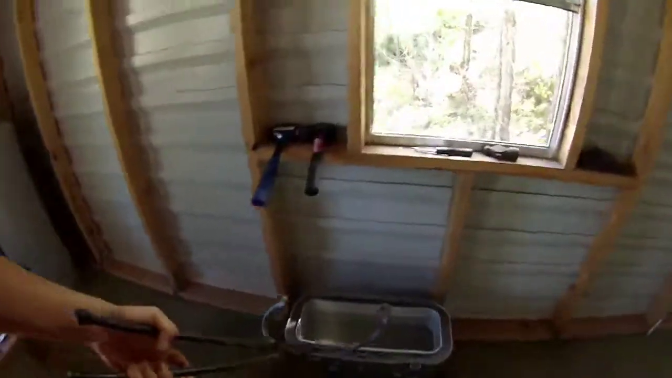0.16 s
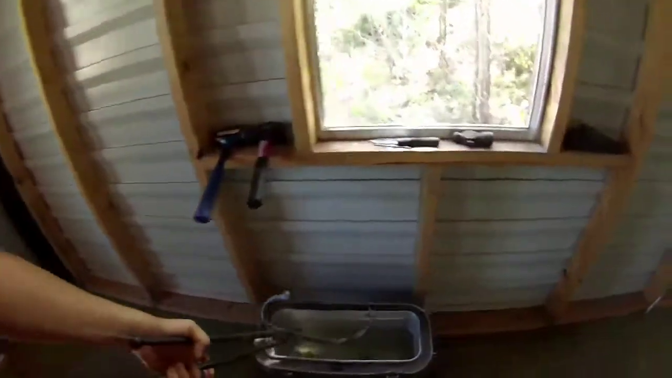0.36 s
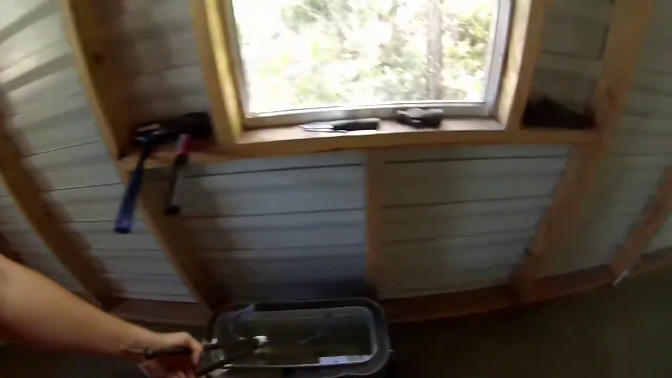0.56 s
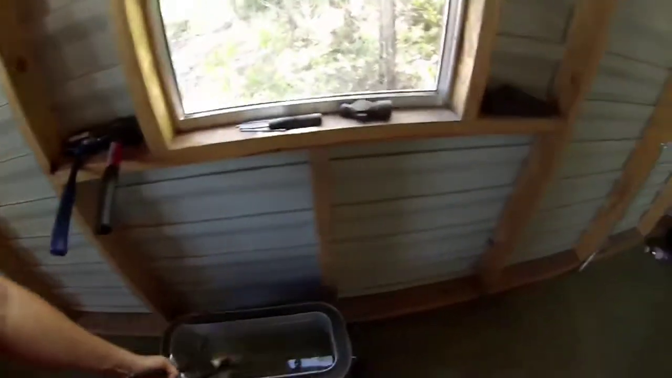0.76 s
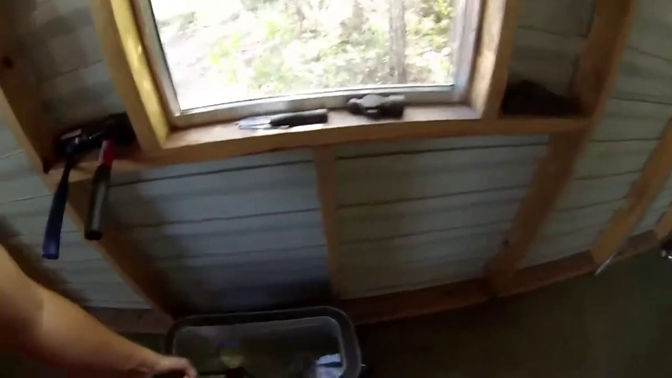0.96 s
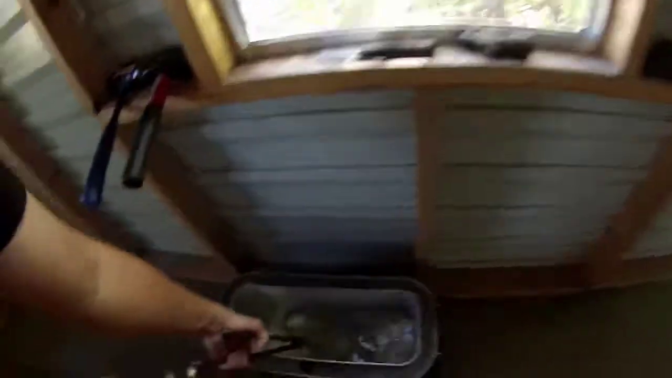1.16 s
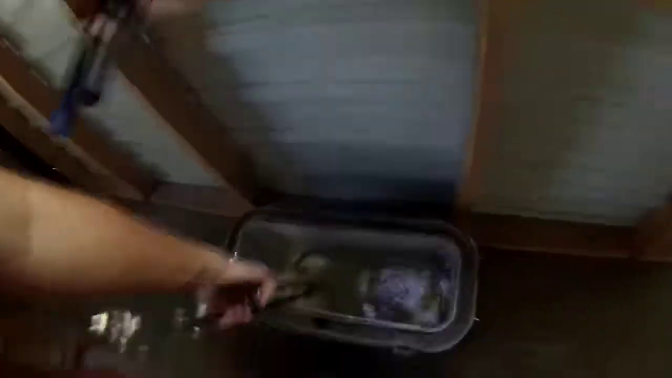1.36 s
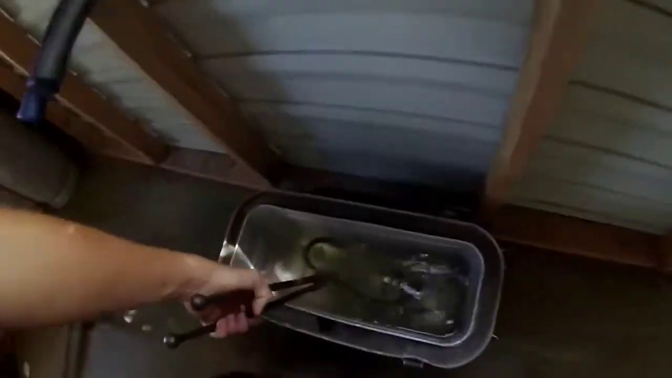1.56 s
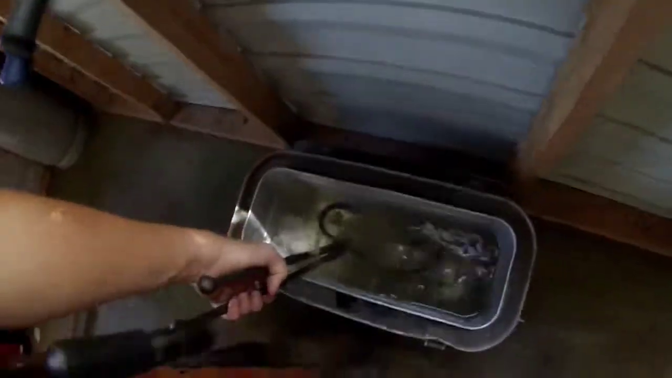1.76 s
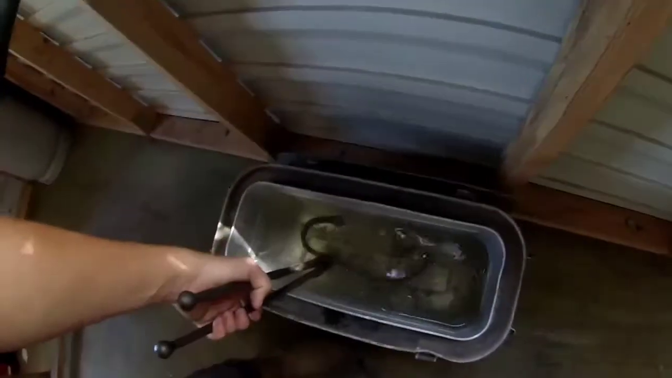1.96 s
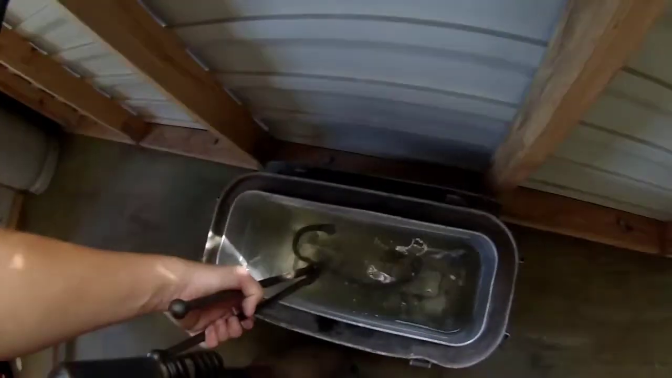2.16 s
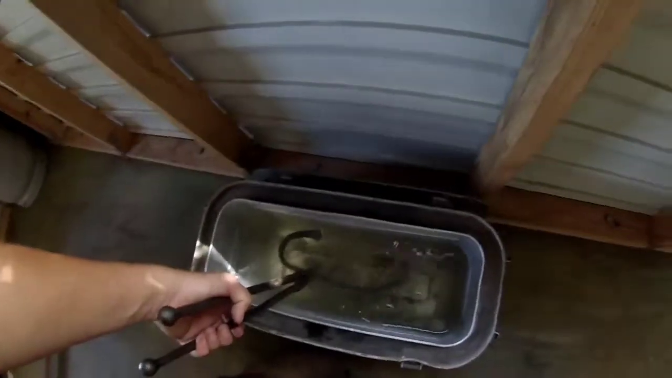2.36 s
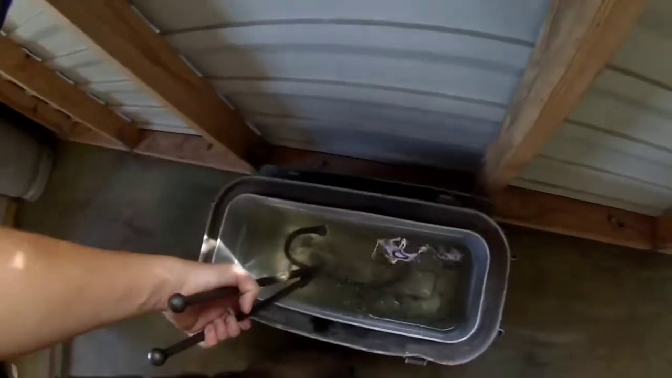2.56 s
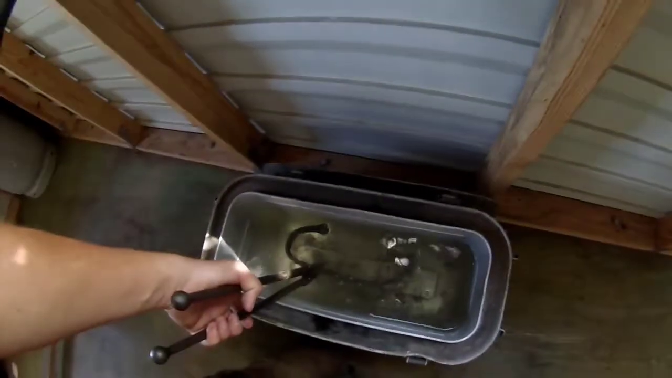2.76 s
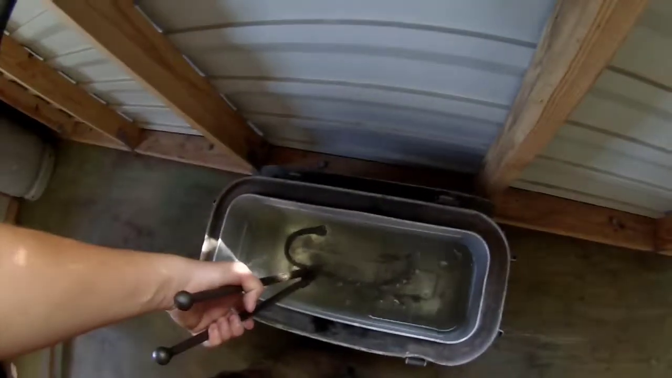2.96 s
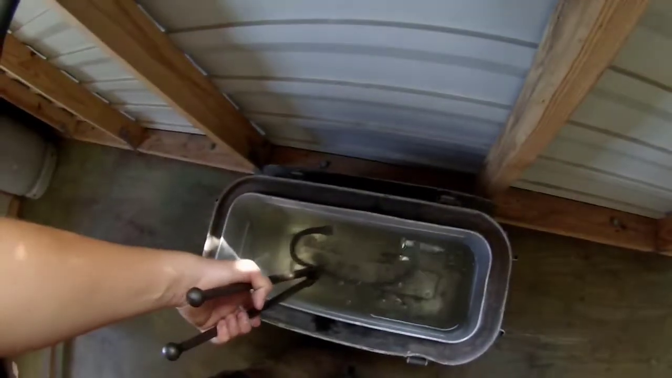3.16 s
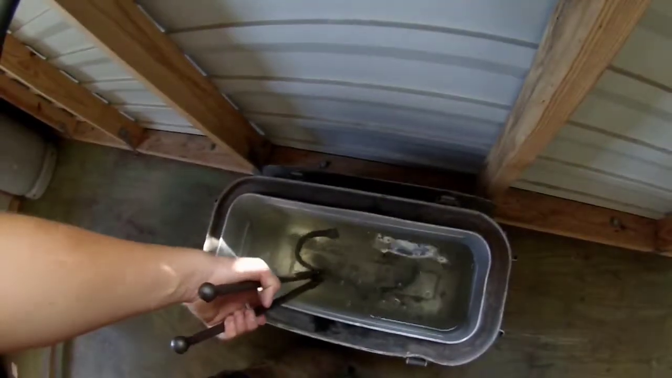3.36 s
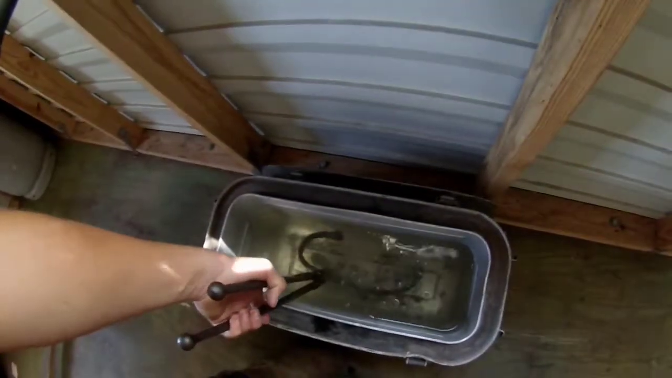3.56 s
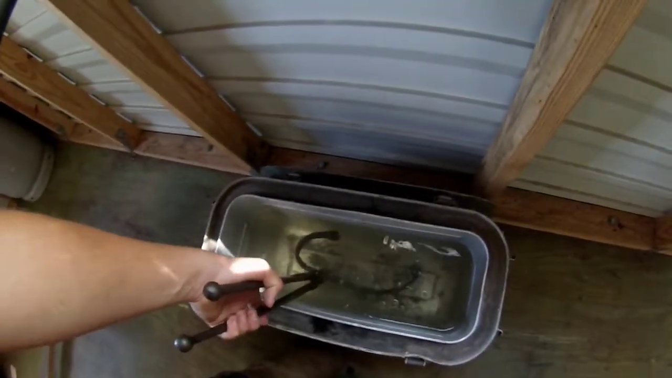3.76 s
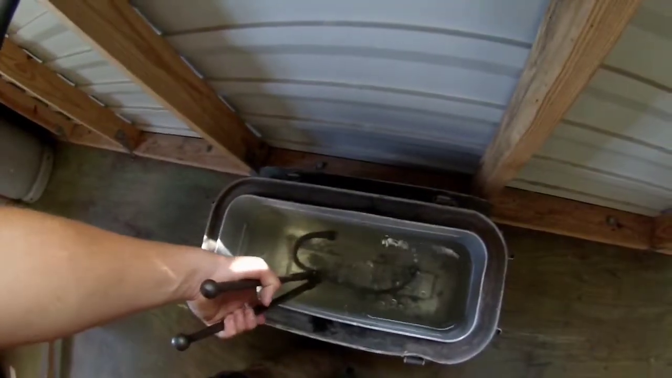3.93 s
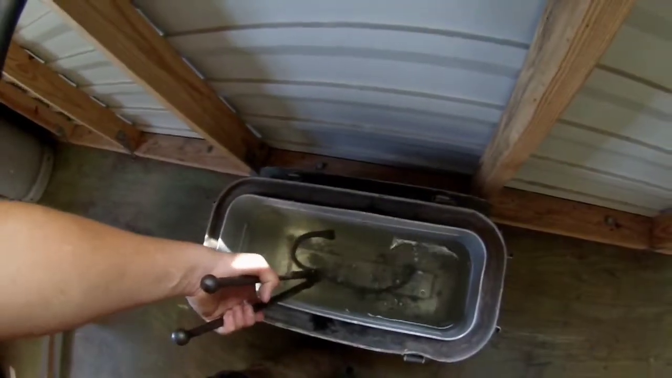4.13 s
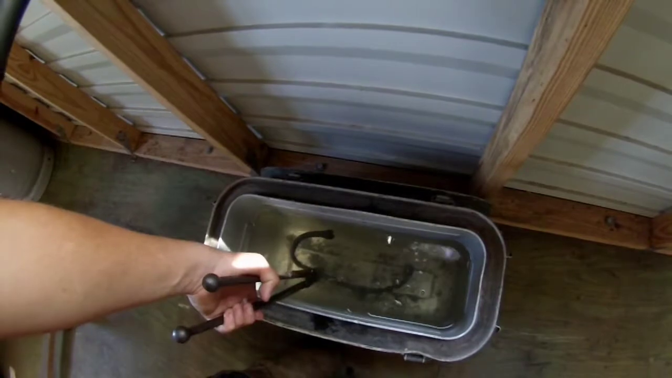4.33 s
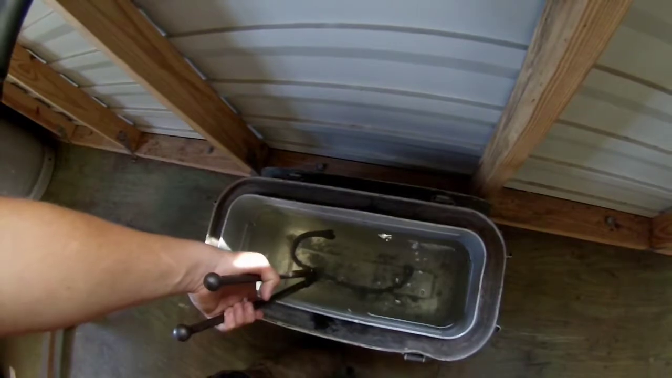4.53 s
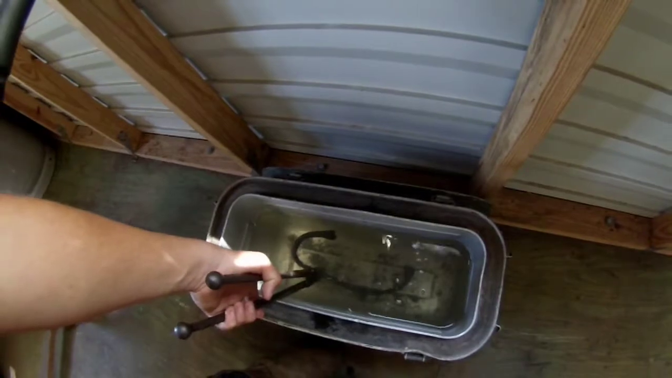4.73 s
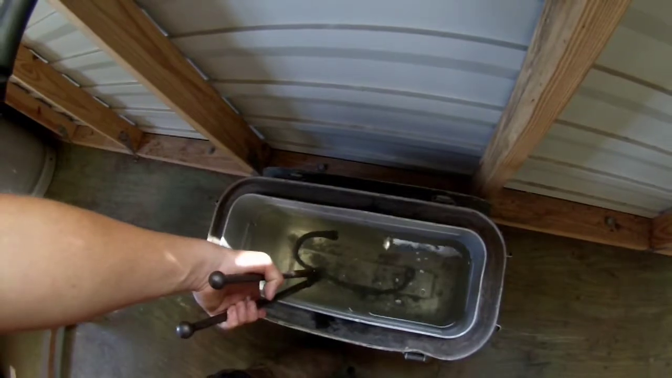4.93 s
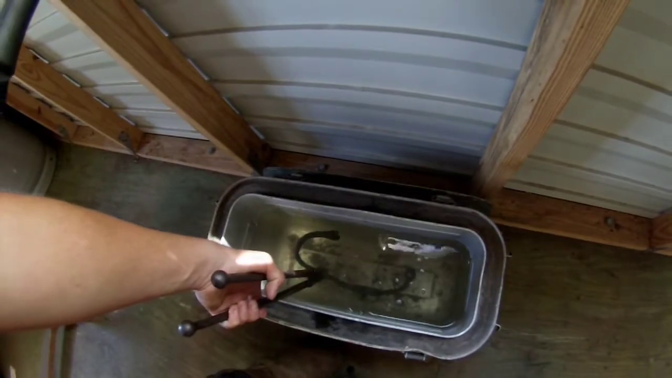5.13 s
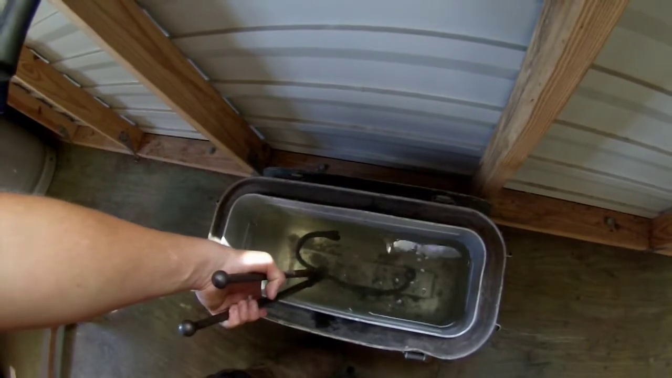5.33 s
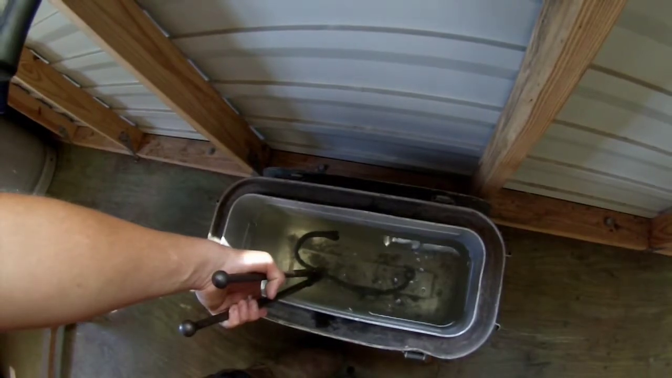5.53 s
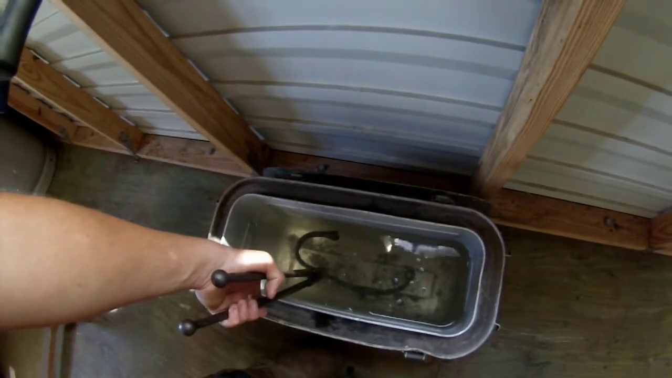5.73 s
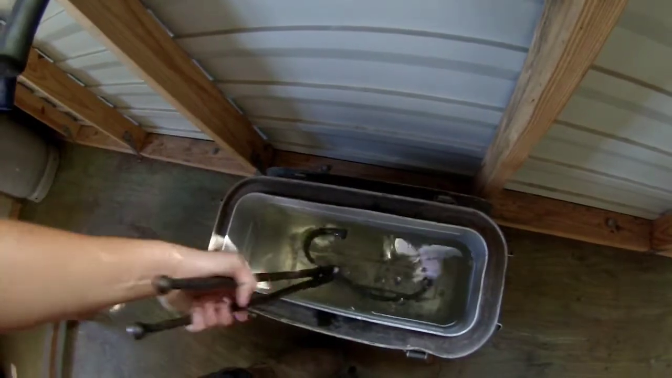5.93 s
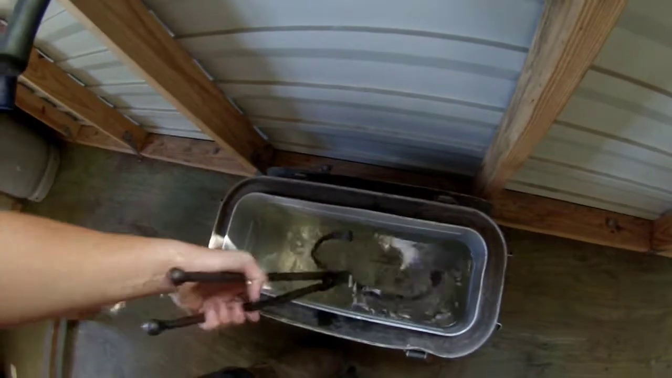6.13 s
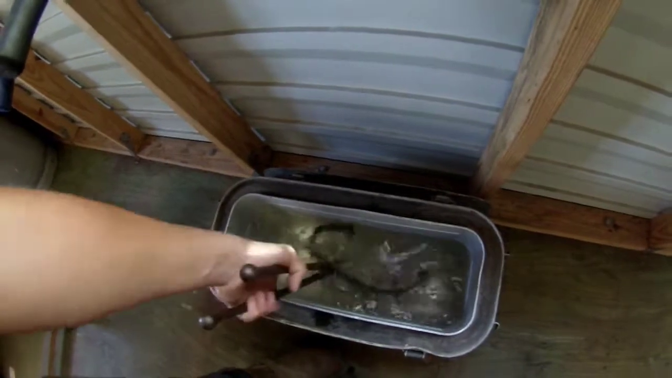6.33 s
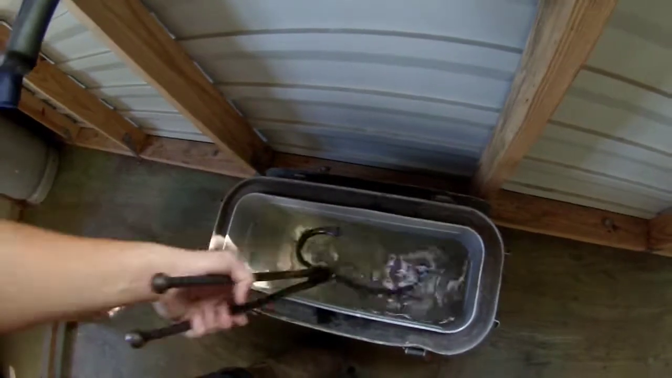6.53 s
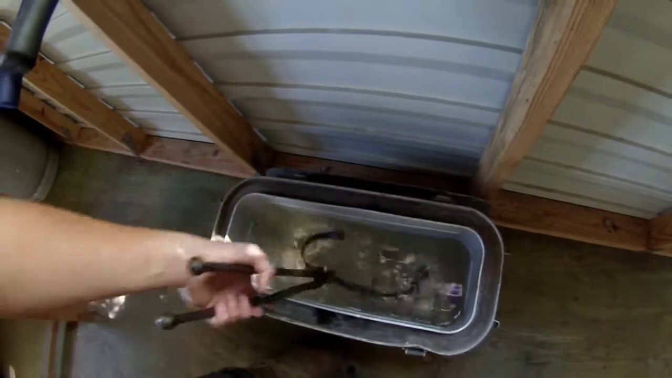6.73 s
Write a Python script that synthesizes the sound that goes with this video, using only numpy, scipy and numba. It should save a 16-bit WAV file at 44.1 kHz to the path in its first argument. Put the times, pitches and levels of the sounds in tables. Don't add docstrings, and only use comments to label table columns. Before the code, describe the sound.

In a small sheet-metal shed, close to a camera microphone with faint steady room noise, shoes thud and scuff on a gritty floor from 0 to 0.8 seconds, the heaviest steps near 0.05, 0.46 and 0.56. At 0.9 hot steel plunges into a metal tub of water: a hard clank and an intense, bright burst of steam. The hiss dips around 1.2, surges again, and a low dull knock lands at 1.44. Uneven sizzling swells near 2 and 2.5 over churning bubbles and singing tub walls. At 3.3 the hiss collapses abruptly; rounded glugs cluster until 4, and thin fizz fades to almost nothing by 5.5. Tongs rattle softly at 5.6 and water sloshes at 5.9. Sharp metallic knocks hit the tub at 6.15, 6.41, 6.66 and 6.86, with splashing drops, brief spray and a short shed echo.

```python
import sys
import numpy as np
from scipy import signal
from scipy.fft import rfft, irfft
from scipy.io import wavfile
from scipy.ndimage import uniform_filter1d
from numba import njit

SR = 44100
rng = np.random.default_rng(int(sys.argv[2]) if len(sys.argv) > 2 else 0)


def natural_amplitude(level_db):
    exponent = np.asarray(level_db, float) / 20
    return 10 ** exponent


def store_pcm(level_fs):
    pcm = np.round(np.clip(level_fs, -1, 1) * 32767).astype(np.int16)
    wavfile.write(sys.argv[1], SR, np.atleast_2d(pcm).T)


N = 303710

TOUCH_S, PLUNGE_S, JACKET_GONE_S, COLD_S = 0.885, 0.923, 3.335, 5.56


def unit(x):
    return x / np.sqrt(np.mean(x ** 2))


@njit
def svf(x, g, k):
    y, b, l = np.empty(len(x)), 0., 0.
    for i in range(len(x)):
        v = (b + g[i] * (x[i] - l)) / (1 + g[i] * (g[i] + k[i]))
        b, l, y[i] = 2 * v - b, l + 2 * g[i] * v, k[i] * v
    return y


def band(x, hz, width_hz):
    one = np.ones(len(x))
    return svf(x + 1e-18, np.tan(np.pi * hz / SR) * one, max(width_hz, 5) / hz * one)


def treble_above(x, hz):
    return signal.sosfilt(signal.butter(2, hz, "high", fs=SR, output="sos"), x)


def colour(x, table):
    hz, db = np.transpose(table)
    f = np.fft.rfftfreq(len(x), 1 / SR) + 1
    return irfft(rfft(x) * natural_amplitude(np.interp(np.log(f), np.log(hz), db)), len(x))


def walk(rate_hz, size=N):
    held = np.repeat(rng.standard_normal(int(max(N, size) / SR * rate_hz) + 2), 8)
    slow = unit(uniform_filter1d(uniform_filter1d(held, size=8), size=8))
    return np.interp(np.arange(size) * (8 * rate_hz / SR), np.arange(len(slow)), slow)


def play(table):
    s, *columns = np.transpose(table)
    return [np.interp(np.arange(N) / SR, s, c, left=c[0]) for c in columns]


def collapses(spread_db, flicker_db, rate_hz):
    uneven_db = spread_db * np.minimum(rng.exponential(1, N), 8)
    return rng.standard_normal(N) * natural_amplitude(uneven_db + flicker_db * walk(rate_hz))


def patchy(crowd, lo_hz, hi_hz, count, patchy_db, drift_db):
    n, sound = len(crowd), 0
    for hz in np.geomspace(lo_hz, hi_hz, count):
        pocket = crowd * rng.choice([-1., 1.], n)
        strength = natural_amplitude(patchy_db * walk(9.25, size=n))
        drifting_hz = hz * natural_amplitude(drift_db * walk(4, size=n))
        sound = sound + strength * band(pocket, drifting_hz, hz / 4.7)
    return np.pad(unit(sound), (0, N - n))


# [f/Hz, level/dB per Hz]
QUIET_SPECTRUM = [(22, -4.5), (60, 3), (170, -4), (600, -7), (1500, -16.5), (2300, -13.5), (4500, -19.5),
                  (8500, -15.5)]
QUIET_DB = -52.5


def quiet():
    return natural_amplitude(QUIET_DB + 0.23 * walk(3.8)) * unit(colour(rng.standard_normal(N), QUIET_SPECTRUM))


# [f/Hz, t60/s, level/dB]
SHED_DECAY = [(70, 0.98, -1.5), (120, 0.64, 4), (190, 0.48, 3), (350, 0.55, -0.5), (800, 0.63, 0),
              (2500, 0.64, -4), (6500, 0.6, -4), (12200, 0.37, -5.5)]
SHED_DB, PLINK_WET_DB = -6, -22


def shed(x):
    t, tail = np.arange(SR // 2) / SR, 0
    hz, t60_s, db = np.transpose(SHED_DECAY)
    for f in 60 * 2 ** np.arange(0, 8.1, .5):
        band_t60_s = np.interp(np.log(f), np.log(hz), t60_s)
        band_db = np.interp(np.log(f), np.log(hz), db)
        noise = band(rng.standard_normal(len(t)), f, f / 2)
        tail = tail + natural_amplitude(band_db) * noise * 1000 ** (-t / band_t60_s)
    tail = tail * (1 - np.exp(-t / 0.0076))
    return signal.oaconvolve(x, tail / np.sqrt(np.sum(tail ** 2)))[:N]


ECHO_DB, ECHO_T60_S, ECHO_LOW_HZ, ECHO_SHIFTS_HZ = -11, 0.042, 3500, 1.5


def echoes(x):
    t = np.arange(SR // 16) / SR
    taps = rng.standard_normal((2, len(t))) * 1000 ** (-t / ECHO_T60_S) * (t > .001)
    bright = treble_above(x, ECHO_LOW_HZ)
    a, b = (signal.oaconvolve(bright, h / np.sqrt(np.sum(h ** 2)))[:N] for h in taps)
    lean_rad = 2 * walk(ECHO_SHIFTS_HZ)
    return x + natural_amplitude(ECHO_DB) * (a * np.cos(lean_rad) + b * np.sin(lean_rad))


def impacts(table, width, rise_s, sub_db, crack_share, knock_db, snap):
    out, span = np.zeros(N + SR), SR // 4
    t = np.arange(span) / SR
    for s, db, hz, mid_db, top_db, length_s in table:
        low, mid, top = rng.standard_normal((3, span)) * (1 - np.exp(-t / rise_s))
        low[:24] += snap
        mid[:3] += snap
        low = low * 1000 ** (-t / max(length_s, .004))
        crack_fade = 1000 ** (-t / max(crack_share * length_s, .004))
        mid, top = mid * crack_fade, top * crack_fade
        knock_hz = hz + 480
        sag_hz = hz * (0.91 + 0.44 * np.exp(-t / 0.0028))
        parts = [band(band(low, sag_hz, width * hz), sag_hz, 3.0 * hz),
                 band(band(low, 93, 103), 75, 115),
                 band(band(low, knock_hz, knock_hz), knock_hz, 2 * knock_hz),
                 band(band(mid, 2470, 7100), 2470, 7100),
                 band(band(top, 10200, 9700), 7100, 16000)]
        gains = natural_amplitude(np.array([db, db + sub_db, db + knock_db, db + mid_db, db + top_db]))
        i = int(s * SR)
        out[i:i + span] += sum(g * p / np.abs(p).max() for g, p in zip(gains, parts))
    return out[:N]


def with_treble(table, rel_db):
    return [(s, db, hz, mid_db, mid_db + rel_db, length_s) for s, db, hz, mid_db, length_s in table]


# [t/s, peak level/dB, thud f/Hz, grit level/dB, length/s]
FOOTFALLS = [(0.0, -20.5, 204, -7.5, 0.23), (0.037, -12.5, 222, -21.5, 0.11),
             (0.079, -21.5, 250, -20, 0.28), (0.222, -27.5, 285, -25, 0.06), (0.277, -32, 137, -12, 0.12),
             (0.346, -34.5, 630, -3, 0.16), (0.415, -28.5, 490, -10.5, 0.14),
             (0.457, -15.5, 238, -2.5, 0.18), (0.559, -9.5, 205, -36, 0.06), (0.590, -20, 335, -30, 0.08),
             (0.635, -26, 700, -22, 0.054), (0.713, -29, 400, -8, 0.11), (0.831, -32.5, 172, -20, 0.16),
             (5.134, -49, 108, -7, 0.074)]
DUST_DB = -9.5


def steps():
    return impacts(with_treble(FOOTFALLS, DUST_DB), 1.0, 0.001, -9.5, 2.82, knock_db=-11.5, snap=0.79)


# [t/s, peak level/dB, body f/Hz, crack level/dB, length/s]
TONG_STIRS = [
    (5.571, -45, 2000, 4.5, 0.26),
    (5.895, -44, 600, -17, 0.3),
    (5.93, -42, 560, -12, 0.13),
    (6.016, -52, 900, 5, 0.038),
    (6.073, -42, 1410, -11, 0.028),
]
STIR_SPARKLE_DB = 3


def stirs():
    return impacts(with_treble(TONG_STIRS, STIR_SPARKLE_DB), 0.6, 0.0022, -29, 1.0, knock_db=-20, snap=0.3)


# [t/s, peak level/dB, body f/Hz, crack level/dB, sparkle level/dB]
TUB_BLOWS = [(0.926, -5, 470, 0.5, -8), (0.944, -5.5, 352, -13, -5), (1.439, -5.5, 186, -11, -4.5),
             (6.145, -8, 440, -5, -30), (6.163, -9.5, 286, -30, -30), (6.193, -19.5, 420, -7, -6),
             (6.225, -17.5, 696, -25, -4.5), (6.410, -11, 301, -16, -5.5), (6.414, -11.5, 465, 2, -2.5),
             (6.655, -6, 393, -5, -23), (6.671, -9, 860, 3.5, -1), (6.851, -17.5, 490, -10, -2),
             (6.873, -22.5, 720, -1, 0)]
BLOW_CYCLES = 31.5


def blows():
    table = [(*row, BLOW_CYCLES / (row[2] + 80)) for row in TUB_BLOWS]
    return impacts(table, 0.77, 0.00016, -14.0, 0.7, knock_db=-7.0, snap=0.7)


# [t/s, level/dB]
DROPLET_SHOWERS = [
    (6.15, -27),
    (6.415, -32),
    (6.66, -24),
]
SPLASH_S, DROP_LO_HZ, DROP_OCTAVES, DROP_CYCLES, DROP_DB_PER_S = 0.18, 450, 1.6, 12, -70


def droplets():
    rows = []
    for s, db in DROPLET_SHOWERS:
        when, size, pitch = rng.random((28, 3)).T
        delay_s = SPLASH_S * when
        hz = DROP_LO_HZ * 2 ** (DROP_OCTAVES * pitch)
        rows += zip(s + delay_s, db + DROP_DB_PER_S * delay_s - 8 * size, hz, DROP_CYCLES / hz)
    return rows


# [t/s, peak level/dB, f/Hz, t60/s]
BUBBLE_GLUGS = [(2.801, -39, 477, 0.038), (3.298, -20.5, 453, 0.035), (3.419, -26, 450, 0.036),
                (3.46, -25, 450, 0.1), (3.509, -27, 462, 0.081), (3.555, -31, 440, .06),
                (3.85, -43, 300, 0.027), (3.9, -38, 481, 0.03), (3.93, -35.5, 427, 0.067),
                (3.999, -38, 440.6, 0.029), (4.36, -41, 450, 0.075), (4.411, -44, 470, 0.045),
                (4.72, -43.5, 484, .06), (5.061, -46, 467, 0.072)]
# [t/s, peak level/dB, f/Hz, t60/s]
CONTACT_RINGS = [(.462, -10.5, 264, 0.086), (.561, -8, 218, 0.079), (0.591, -28, 180, .08),
                 (1.443, -13, 190, 0.12), (.353, -42, 2600, 0.2), (.56, -15.5, 642, 0.073),
                 (.61, -27, 556, 0.055), (.834, -37, 1010, .04), (5.572, -47, 7750, .15),
                 (5.58, -53, 12900, .12), (5.932, -39.5, 572, 0.13), (6.018, -32, 2250, 0.036),
                 (6.074, -30, 1400, 0.049), (6.076, -46, 1416, 0.54), (6.195, -27, 1970, .03),
                 (6.197, -26, 1250, 0.05), (6.18, -26, 1020, .035), (6.222, -14, 970, .025),
                 (6.745, -21, 1010, 0.037), (6.218, -15, 2390, 0.025), (6.225, -25, 7830, 0.033),
                 (6.672, -14, 8070, 0.031), (6.675, -34, 8000, .2), (6.675, -21, 2530, 0.025),
                 (6.418, -23.5, 2830, .05), (6.671, -10, 5160, 0.017),
                 (6.42, -18, 280, .15), (6.69, -24, 180, .25), (6.2, -28, 62, .4), (.94, -14, 110, 0.08),
            (.945, -12, 600, .05), (.958, -11.5, 380, 0.075), (.955, -14.5, 270, .09),
            (1.44, -10, 130, 0.065), (1.442, -11, 543, 0.048), (1.458, -16, 310, 0.16),
            (1.47, -16.5, 236, .12), (1.49, -16, 195, .1), (1.56, -24, 520, .05), (6.672, -21, 3750, .03),
            (6.879, -27, 3300, 0.019), (0.928, -2.5, 450, 0.043), (.93, -11, 800, 0.053),
            (6.147, -9.5, 450, 0.053), (6.165, -12.5, 381, 0.099), (6.226, -12, 664, 0.094),
            (6.234, -16.5, 659, 0.11), (6.247, -10.5, 660, 0.12), (6.29, -24, 677, .06),
            (6.412, -7, 623, 0.064), (6.414, -17, 830, 0.04), (6.414, -19, 1660, 0.039),
            (6.417, -3.5, 439, 0.047), (6.656, -9, 800, 0.035), (6.662, -13.5, 460, 0.063),
            (6.674, -14, 872, 0.048), (6.66, -23, 187, 0.1), (6.147, -22, 130, 0.18), (6.15, -21, 261, .12),
            (6.46, -32, 71, 0.84), (6.415, -22, 190, 0.16), (6.854, -26, 350, 0.16),
            (6.852, -14.5, 520, 0.06), (6.862, -15, 528, 0.1), (6.879, -10.5, 673, 0.079)]
WAVER_HZ, WAVER_AFTER_S, WAVER_DB, WAVER_PITCH = 45, .05, 3.5, .025


def plinks():
    age, out = np.arange(SR // 4) / SR, np.zeros(N + SR)
    swell, bend = walk(WAVER_HZ, size=N + SR), walk(WAVER_HZ, size=N + SR)
    late = np.clip(age / WAVER_AFTER_S, 0, 1)
    for s, db, hz, t60_s in BUBBLE_GLUGS + CONTACT_RINGS + droplets():
        here = slice(int(s * SR), int(s * SR) + len(age))
        level = (1 - np.exp(-age * hz / 0.83)) * 1000 ** (-age / t60_s)
        level = level * natural_amplitude(WAVER_DB * late * swell[here])
        cycles = hz * np.cumsum(1 + WAVER_PITCH * late * bend[here]) / SR
        out[here] += natural_amplitude(db) * level * np.sin(2 * np.pi * cycles)
    return out[:N]


# [t/s, peak level/dB, f/Hz]
BRIGHT_SPITS = [(5.682, -50, 10500), (5.76, -49, 10500), (5.775, -49, 10000), (5.838, -50, 14000),
                (5.89, -50, 14000), (5.967, -49, 13000), (5.997, -50, 12500), (6.038, -45, 12000),
                (.355, -40, 3900), (.46, -21, 3700), (.462, -33, 8000), (4.925, -39, 10000),
                (4.93, -44, 5600), (5.40, -43, 10000), (5.745, -47, 10500), (5.787, -41, 9200),
                (5.812, -43, 9100), (5.855, -48, 9000), (6.09, -44, 10500), (6.10, -44, 9600),
                (6.25, -35, 5600), (6.272, -38, 5500), (6.271, -36, 9500), (6.33, -40, 10500),
                (6.345, -41, 7500), (6.386, -40, 9500), (6.592, -31.5, 7000), (6.595, -42, 10500),
                (6.778, -38, 12400), (6.836, -29, 10000), (6.841, -33, 10000), (6.846, -29, 5000),
                (6.875, -15.5, 5700), (6.882, -15, 7000), (.278, -36, 1600), (.022, -40, 9200),
                (.097, -41, 12000), (.74, -38, 7800), (.83, -38, 7500), (6.854, -28, 12600),
                (6.414, -6, 9600), (6.415, -16, 14000)]
SPIT_S, SPIT_TAIL_S, SPIT_TAIL_DB = 0.00094, .008, -15


def ticks():
    when, size, pitch = rng.random((70, 3)).T
    faint = np.transpose([4.8 + 1.9 * when ** .7, -52 - 10 * size, 7500 * 1.8 ** pitch])
    out, age = np.zeros(N + SR), np.arange(2048) / SR
    fade = np.exp(-age / SPIT_S) + natural_amplitude(SPIT_TAIL_DB) * np.exp(-age / SPIT_TAIL_S)
    for s, db, hz in [*BRIGHT_SPITS, *faint]:
        burst = rng.standard_normal(len(age)) * fade
        spit = band(band(burst, hz, hz / 4.5), hz, hz / 2)
        out[int(s * SR):int(s * SR) + len(age)] += natural_amplitude(db) * spit / np.abs(spit).max()
    return out[:N]


# [start t/s, end t/s, f/Hz, start level/dB, fade/dB]
SINGING_MODES = [(1.7, 3.18, 691, -38.5, 7.5), (2.398, 2.5, 7200, -39, -2), (2.75, 3.15, 3950, -40, 5),
                 (3.0, 4.62, 2410, -46, -8.5), (3.9, 5.17, 2400, -53.5, -8), (4.7, 5.94, 2400, -60.5, -5),
                 (2.9, 6.2, 2040, -49.5, -21), (3.3, 6.1, 3160, -60, -20), (2.3, 4.6, 1500, -43, -18),
                 (3.3, 4, 4110, -48, -4), (4.2, 5.3, 5550, -58, -10), (4.3, 5.3, 6030, -62, -6),
                 (3.8, 4.5, 6450, -54, -2), (4, 4.44, 5900, -55, -7), (3.5, 4.4, 8930, -56.5, -4),
                 (3.4, 4.26, 3560, -59, -8), (1.2, 1.35, 6900, -36, -2), (1.15, 1.7, 7320, -38, -9),
                 (1.42, 2.9, 4450, -44, -4), (1.93, 2.16, 7950, -33, -2), (1.93, 2.8, 5000, -43, -5),
                 (2.25, 3.02, 6630, -40.5, 4), (1.85, 2.9, 3390, -42, 0), (2.7, 3.4, 3400, -42.5, 2),
                 (1.9, 2.9, 2220, -51, -1), (1.2, 1.9, 10800, -46, -6), (2.4, 2.9, 5150, -42, 1),
                 (2.05, 2.8, 1330, -39.5, 0)]
SING_WIDTH_HZ, SING_Q = 42, 50
# [start t/s, end t/s, start f/Hz, end f/Hz, start
# level/dB]
FIZZ_BANDS = [(1.22, 1.6, 1370, 1500, -34.5), (1.35, 1.46, 2200, 2000, -38),
              (0.89, 1.56, 8100, 7100, -36), (1.97, 3.35, 1030, 1420, -37), (2.6, 3.46, 720, 1030, -35.5),
              (2.8, 4.3, 7300, 8560, -44), (3.053, 5.1, 9700, 10100, -48.5), (3.36, 4.7, 410, 450, -52),
              (3.301, 3.83, 1040, 1130, -42.5), (3.6, 5.3, 1120, 1050, -54),
              (3.6, 6.3, 6300, 5700, -51.5), (3.7, 5.5, 5840, 5300, -48.5),
              (3.28, 3.65, 4800, 3900, -45.5), (3.3, 3.6, 5600, 5300, -51), (3.3, 4.2, 2930, 3000, -51),
              (0.95, 1.19, 2900, 3100, -33.5), (4.4, 5.6, 8100, 7500, -57), (1.1, 1.52, 560, 400, -34),
              (3.4, 4.16, 4400, 4600, -49.5), (2.4, 3.86, 3400, 3200, -55),
              (5.555, 5.74, 1650, 1740, -52), (5.555, 5.74, 2400, 2300, -53),
              (5.555, 5.72, 3300, 3300, -55), (1.02, 1.12, 3000, 3400, -29), (1.06, 1.2, 2390, 2350, -38),
              (3.3, 3.9, 4040, 4100, -47), (3.45, 4.2, 8300, 8300, -51), (.34, 0.42, 7000, 7000, -54),
              (4.0, 5.3, 4300, 4300, -57), (2.65, 3.35, 810, 850, -39), (0, .17, 11500, 11500, -50)]
POCKET_WIDTH_HZ, POCKET_Q, POCKET_DB_PER_S = 120, 8.8, -9.5
# [t/s, f/Hz, level/dB]
SHORT_SPRAYS = [(6.415, 4600, -36.5), (6.414, 9600, -42), (6.414, 8200, -50), (6.672, 5000, -40),
                (5.56, 9400, -55), (5.56, 11100, -55), (5.56, 12900, -54), (5.56, 14300, -55),
                (5.565, 6100, -57), (0.43, 1860, -38), (6.672, 9100, -43), (6.672, 7500, -42)]
SPRAY_S, SPRAY_Q, SPRAY_FADE_DB = 0.22, 7.9, -19.5
# (start t/s, end t/s, start f/Hz, end f/Hz, width/Hz, level/dB, fade/dB)
LAST_FIZZ = (3, 5.5, 7200, 10007, 7202, -41.5, -19)


def pockets():
    rows = [(a, b, hz, hz, SING_WIDTH_HZ + hz / SING_Q, db, fade_db) for a, b, hz, db, fade_db in SINGING_MODES]
    for a, b, hz0, hz1, db in FIZZ_BANDS:
        cooled_db = POCKET_DB_PER_S * max(b - max(a, JACKET_GONE_S), 0)
        rows.append((a, b, hz0, hz1, POCKET_WIDTH_HZ + hz0 / POCKET_Q, db, cooled_db))
    rows += [(s, s + SPRAY_S, hz, hz, hz / SPRAY_Q, db, SPRAY_FADE_DB) for s, hz, db in SHORT_SPRAYS]
    return rows + [LAST_FIZZ]


POCKET_DRIFT = .004


def simmer():
    out, crowd = np.zeros(N), collapses(1.5, 1.04, 30.12)
    for start, end, hz0, hz1, width_hz, db, fade_db in pockets():
        i, j = int(start * SR), min(int(end * SR), N)
        age = np.linspace(0, 1, j - i)
        hz = (hz0 + (hz1 - hz0) * age) * (1 + POCKET_DRIFT * walk(5.2, size=j - i))
        edges = np.clip(age / 0.11, 0, 1) * np.clip((1 - age) / 0.47, 0, 1)
        clicks = crowd[i:j] * rng.choice([-1., 1.], j - i)
        fizz = band(band(clicks, hz, width_hz), hz, 2.4 * width_hz)
        out[i:j] += natural_amplitude(db + fade_db * age + 1.3 * walk(14, size=j - i)) * edges * unit(fizz)
    return out


# [t/s, level/dB]
BOIL_VIGOUR = [
    (0.93, -23.5),
    (1.05, -27.5),
    (1.17, -32.5),
    (1.38, -27),
    (1.58, -33),
    (1.84, -32.5),
    (2.1, -29),
    (2.55, -28.5),
    (3.0, -34.5),
]
# [f/Hz, width/Hz, level/dB]
TUB_WALLS = [(1480, 130, -3.5), (2070, 79, -3), (2347, 200, -2), (3410, 106, -3.5)]
# [f/Hz, width/Hz, level/dB]
TUB_BELLY = [(243, 61, 0), (451, 48, 6.5), (696, 27, 1.5), (1010, 60, -3.5)]
# [t/s, level/dB, fade/dB per s]
WATER_HEAVES = [
    (0.93, -27, -74),
    (1.08, -41, -12.5),
    (1.43, -34, -72),
    (1.6, -39, -16.5),
    (3.33, -45, -20),
    (4.3, -64, -18),
]
CALM_DB, CALM_S, COOL_DB_PER_S = -4.5, 0.086, -14.5
CHURN_HOT_DB, CHURN_DB, CHURN_RISE_S = -3, 0.97, 1
CHURN_STOPS_S, CHURN_COLD_DB = 3.57, -3
BUBBLE_HZ, BUBBLE_HZ_PER_S, BUBBLE_COLD_HZ_PER_S = 510, 137, -80
BELLY_DB, BELLY_DB_PER_S, BELLY_SETTLES_S = -2.5, -3, 1.54


def boil():
    drive, t = collapses(2.5, 0.24, 30.0), np.arange(N) / SR
    late_s = np.clip(t - JACKET_GONE_S, 0, None)
    calm_db = CALM_DB * np.clip(late_s / CALM_S + .5, 0, 1) * (late_s > 0)
    sing_db = play(BOIL_VIGOUR)[0] + calm_db + COOL_DB_PER_S * late_s
    churn_db = sing_db + CHURN_DB + CHURN_HOT_DB * np.clip(1 - (t - PLUNGE_S) / CHURN_RISE_S, 0, 1)
    churn_db = churn_db + CHURN_COLD_DB * np.clip((t - CHURN_STOPS_S) / 0.048, 0, 1)

    walls = sum(natural_amplitude(db + 1.8 * walk(14)) * unit(band(drive, f, w)) * np.sqrt(w) for f, w, db in TUB_WALLS)
    sing = natural_amplitude(np.clip(t - 3.6, -9, -1.5)) * unit(walls)
    sing = sing + patchy(drive, 1940, 4090, count=6, patchy_db=-2.4, drift_db=1.3)

    drive = collapses(2.06, 0.18, 25.3)
    belly = sum(natural_amplitude(db + 2.2 * walk(10.24)) * unit(band(drive, f, w)) for f, w, db in TUB_BELLY)
    belly_db = BELLY_DB + BELLY_DB_PER_S * np.clip(t - PLUNGE_S, 0, BELLY_SETTLES_S)
    hot_s = np.clip(t - PLUNGE_S, 0, JACKET_GONE_S - PLUNGE_S)
    hz = BUBBLE_HZ + BUBBLE_HZ_PER_S * hot_s + BUBBLE_COLD_HZ_PER_S * late_s
    churn = unit(band(drive, np.clip(hz, 100, None), 430)) + natural_amplitude(belly_db) * unit(belly)

    rumble = unit(band(band(drive, 290, 400), 130, 600)) + natural_amplitude(-5) * unit(band(drive, 76, 70))
    heave = sum(natural_amplitude(db + fade_db * np.clip(t - s, 0, None)) * np.clip((t - s) / 0.03 + 1, 0, 1)
                for s, db, fade_db in WATER_HEAVES)
    under = natural_amplitude(churn_db + 0.6 * walk(9)) * unit(churn) + heave * natural_amplitude(2.0 * walk(7.93)) * unit(rumble)
    under = under * np.clip((t - PLUNGE_S) / 0.015, 0, 1)
    start = np.clip((t - TOUCH_S) / (BOIL_VIGOUR[0][0] - TOUCH_S), 0, 1) ** 1.6
    return (natural_amplitude(sing_db - 2.5) * sing * start + under) * np.clip((COLD_S - t) / .15, 0, 1)


# [peak t/s, hiss level/dB, rise/s, fade/dB per s, air level/dB re hiss]
STEAM_GUSHES = [(0.91, -19, 0.04, -90, -7), (1.0, -15.5, 0.058, -85, -2.5), (1.045, -22.5, 0.03, -75, -6),
                (1.21, -26.5, 0.074, -62, 4), (1.29, -22.5, 0.17, -20, -4.5), (1.73, -27.5, 0.15, -29, -5),
                (1.97, -25, 0.12, -2.5, -2.5), (2.51, -28.5, 0.17, -10.5, -6), (3.159, -29, 0.18, -57, 3.5),
                (1.4, -37, .1, -120, 8), (3.272, -35, .02, -250, 4), (3.322, -35, .015, -150, 0)]
STEADY_GUSH_END_S, GUSH_END_DB_PER_S = 2.38, -15.5
ROAR_DB, ROAR_DB_PER_S, ROAR_FAILS_S = -7.5, 2.5, .06
REMNANT_DB, REMNANT_DB_PER_S = -15, -24


def steam():
    t = np.arange(N) / SR
    failing_db = GUSH_END_DB_PER_S * np.clip(t - STEADY_GUSH_END_S, 0, None)
    hiss_power = air_power = 0
    for s, db, rise_s, fade_db, air_db in STEAM_GUSHES:
        gush_db = db + fade_db * np.clip(t - s, 0, None) + failing_db * (s < STEADY_GUSH_END_S)
        gush = np.clip(1 + (t - s) / rise_s, 0, 1) ** 1.18 * natural_amplitude(gush_db)
        hiss_power = hiss_power + gush ** 2
        air_power = air_power + (gush * natural_amplitude(air_db)) ** 2
    drive = collapses(1.84, 0.84, 60.03)[:N // 2]
    air = treble_above(collapses(2.2, 2.0, 19), 10500)
    hiss = patchy(drive, 6530, 10570, count=5, patchy_db=-2.2, drift_db=0.5)
    roar_db = ROAR_DB + ROAR_DB_PER_S * np.clip(t - TOUCH_S, 0, 3)
    roar_db = roar_db - 6.6 * np.clip(1 + (t - JACKET_GONE_S) / ROAR_FAILS_S, 0, 1)
    hiss = hiss + natural_amplitude(roar_db) * patchy(drive, 4020, 6500, count=4, patchy_db=1.4, drift_db=1.0)
    remnant = natural_amplitude(REMNANT_DB + REMNANT_DB_PER_S * np.abs(t - JACKET_GONE_S))
    jacket = np.maximum((JACKET_GONE_S - t) / 0.0086 + 1, remnant).clip(0, 1)
    return (np.sqrt(hiss_power) * hiss + np.sqrt(air_power) * unit(air)) * jacket


def scene():
    contacts, knocks, rings = steps() + stirs(), blows(), plinks()
    wet = shed(natural_amplitude(SHED_DB) * (contacts + natural_amplitude(-5.0) * knocks) + natural_amplitude(PLINK_WET_DB) * rings)
    wet = wet * natural_amplitude(1.2 * walk(40))
    water = natural_amplitude(-0.31) * echoes(steam() + boil() + simmer()) + ticks()
    return np.tile(water + contacts + knocks + rings + wet + quiet(), (2, 1))


FLECKS, FLECK_DB = 26, -1.5


def flecks(mono):
    side, span = np.zeros(N), 2048
    for k, (when, shift) in enumerate(rng.random((FLECKS, 2))):
        i = int((1.1 + 2.3 * when) * SR)
        hz = 4800 * 2.84 ** ((k + shift) / FLECKS)
        part = lambda x: band(band(band(x, hz, hz / 4), hz, hz / 4), hz, hz / 4)
        fleck = unit(part(rng.standard_normal(span))) * np.hanning(span)
        side[i:i + span] += fleck * part(mono[i:i + span]).std()
    return natural_amplitude(FLECK_DB) * side + natural_amplitude(-80.0) * unit(band(rng.standard_normal(N), 300, 900))


def low_pass(x):
    return signal.sosfilt(signal.butter(12, 16310, fs=SR, output="sos"), x)


TOP_HZ = 15280


def record(dry):
    soft = np.tanh(0.81 * dry[0]) / 0.78
    edge = signal.ellip(14, .5, 80, TOP_HZ, fs=SR, output="sos")
    mid, side = signal.sosfilt(edge, [soft, flecks(soft)])
    return low_pass(np.array([mid + side, mid - side]))


dry = scene()
out = record(dry)
store_pcm(out)
```